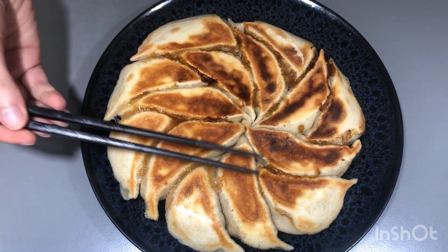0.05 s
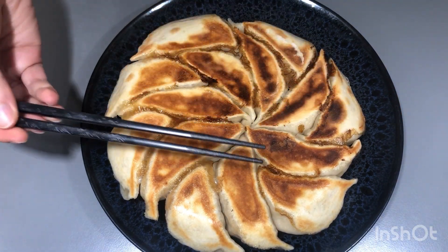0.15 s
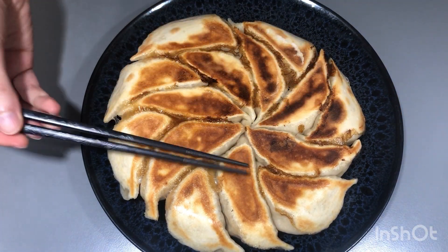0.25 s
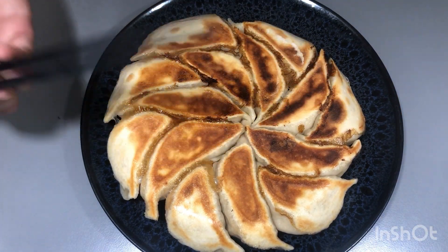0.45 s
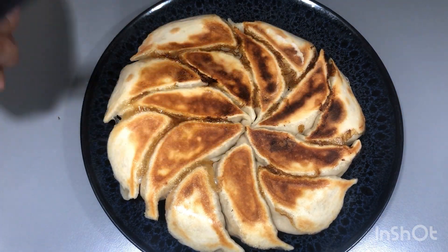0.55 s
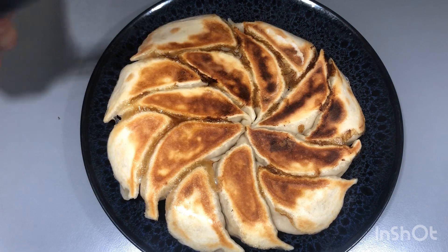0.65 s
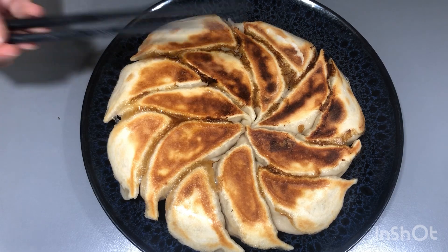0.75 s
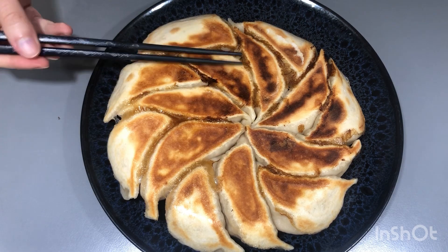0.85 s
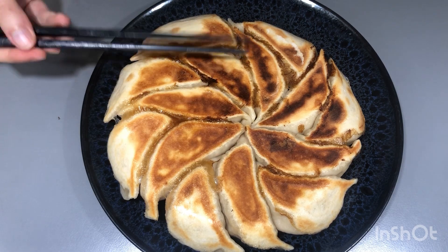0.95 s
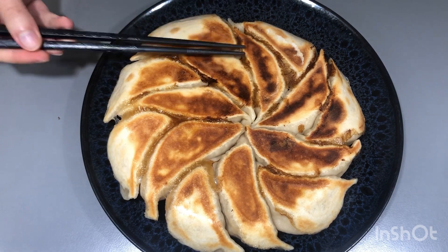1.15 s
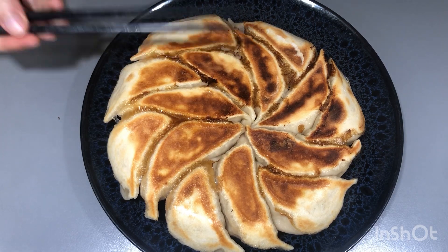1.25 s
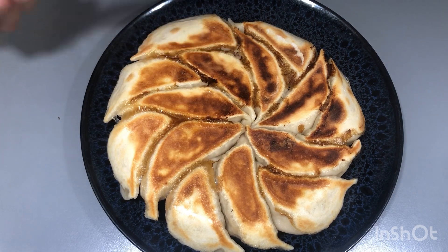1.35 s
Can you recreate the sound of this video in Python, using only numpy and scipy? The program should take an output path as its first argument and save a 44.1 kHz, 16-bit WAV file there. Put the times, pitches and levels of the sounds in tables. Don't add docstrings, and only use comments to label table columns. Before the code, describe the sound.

Chopsticks tapped tips-down on a hard table, three sharp knocks with light clicks between, quiet room

```python
import sys
import numpy as np
from scipy import signal
from scipy.fft import rfft, irfft, next_fast_len
from scipy.io import wavfile
from scipy.ndimage import map_coordinates

SR = 44100
rng = np.random.default_rng(int(sys.argv[2]) if len(sys.argv) > 2 else 0)


def bounce(signal):
    frames = np.transpose(np.atleast_2d(signal))
    limited = np.clip(frames, -1, 1)
    pcm = np.round(limited * 32767).astype(np.int16)
    wavfile.write(sys.argv[1], SR, pcm)


def ratio(d):
    e = np.asarray(d, float) / 20
    return 10 ** e


N = 61739
LEAD_IN = 4096

# frequency in Hz, level in dB per Hz.
FLOOR = [(30, -23.5), (55, -1), (90, 1), (161, -8), (273, -6.5), (470, -16.5), (2000, -29), (13000, -34.5),
         (15500, -26.5)]
FLOOR_DB, HUM_SWING_DB = -64, 1.2

# frequency in Hz, time to fall 60 dB in seconds.
ROOM_DECAY = [(100, 0.9), (600, 0.25), (2000, 0.23), (6000, 0.21), (15000, 0.17)]
KNOCK_ROOM_DB, CRACK_ROOM_DB, CLICK_ROOM_DB, ROOM_DELAY_S = -11, -7, -7, 0.002
EARLY_DB, EARLY_T60 = 3.5, 0.033

# start in seconds, level in dB, loss above the middle in dB per octave,
# loss below it in dB per octave, lift of even over odd high modes in dB.
CLICKS = [
    (0.2963, -40, -4, -0.8, 4.5),
    (0.3755, -40, -5, -3.3, -1.5),
    (0.856, -48.5, -1, 1, -0.5),
    (0.9665, -44, 3.5, -2, -0.5),
    (1.1933, -47, 3, -1.5, 1),
    (1.2539, -49, 16, 1, 1.5),
    (0.1931, -80.5, -11, -15.3, 0.5),
]
BAR_HZ = [1670, 2510, 3090, 3770, 5165, 6685, 8340, 10270, 12280, 14450]
# level in dB, time to fall 60 dB in seconds.
BAR_RING = [(-16.5, 0.017), (-14, .08), (-16, 0.051), (-11.5, 0.097), (-7.5, 0.079), (-0.5, 0.067),
            (-1.5, 0.04), (-4.5, 0.065), (-7, 0.032), (-5, 0.017)]
BAR_RISE_S = 0.0006
TWIN_PITCH, TWIN_DB = 0.98, -12.5
TICK_DB, TICK_T60 = 8.5, 0.032

# start in seconds, knock level in dB, crack level in dB,
# table thud level in dB. The same columns hold for every tap and for the rebound.
JUST_PASSED_TAP = [
    (-.02, -16, -9, -40.5),
]
FIRST_TAP = [
    (.2184, -20.5, -12.5, -44.5),
    (.2207, -32, -9, -48.5),
    (.2214, -29.5, -13, -46),
    (.2226, -30.5, -17.5, -61),
    (.2278, -50.5, -38, -48.5),
]
SECOND_TAP = [
    (.8316, -25.5, -16, -42),
    (.8341, -37, -25, -69),
    (.8385, -41, -39, -65.5),
]
REBOUND = [
    (.8546, -45.5, -38, -71),
    (.8600, -47.5, -43, -63),
    (.8650, -50, -41, -47.5),
    (.8667, -62, -50, -51),
    (.8720, -58, -56, -61),
]
THIRD_TAP = [
    (1.1138, -24, -18.5, -42.5),
    (1.1193, -31, -17, -47.5),
    (1.1264, -33, -45, -51.5),
]

# frequency in Hz, level in dB, time to fall 60 dB in seconds.
JUST_PASSED_BODY = [(296, -16, .05), (640, -10.5, .03), (1250, -9, 0.031), (2210, -10.5, 0.029),
                    (3350, -22.5, 0.023), (6000, -13.5, 0.025)]
FIRST_BODY = [(472, -10.5, 0.032), (754, -7, 0.022), (1008, -11.5, 0.023), (1276, -7, 0.05),
              (1965, -6, 0.033), (2194, -4, 0.047), (3207, -3.5, 0.035), (4410, -2, 0.013),
              (4370, -6, 0.018), (5750, -5, .016), (6570, -5, 0.025), (8870, -11.5, 0.01),
              (11580, -2.5, 0.01), (14870, -4.5, .02)]
SECOND_BODY = [(435, -10.5, 0.049), (642, -5, 0.091), (1250, 5, 0.015), (1318, -17, 0.049),
               (2160, -8.5, 0.028), (3200, -35, 0.016), (8640, -15, 0.048), (10450, -14, 0.045),
               (12420, -12.5, 0.091), (13700, -11, .03), (14600, -15, 0.026)]
REBOUND_BODY = [(670, 2, 0.026), (1110, 3.5, 0.026), (1630, -9.5, 0.084), (1930, 7, 0.013),
                (2190, 1.5, 0.023), (3120, -1, .02)]
THIRD_BODY = [(455, -14, 0.11), (706, -5, 0.03), (1140, -15, 0.019), (1225, 4.5, 0.017), (1370, -5.5, .03),
              (2043, -9, 0.029), (2560, -33, 0.033), (3100, -14, 0.019), (4430, -40, .015),
              (7140, -17, 0.033), (14680, -18, .02)]
KNOCK_RISE_S, KNOCK_LOW_HZ = 0.00065, 324

# frequency in Hz, level in dB per Hz.
FIRST_CRACK = [(600, -10.5), (1500, -5), (4000, -2), (8000, -3.5), (12000, -4), (16000, -2.5)]
SECOND_CRACK = [(300, -7), (1500, -15.5), (4000, -3), (7000, -12.5), (11000, 1.5), (16000, 4)]
REBOUND_CRACK = [(300, -21), (2000, 8.5), (5000, 3.5), (7000, -24), (16000, -32)]
THIRD_CRACK = [(300, -3.5), (1500, 2), (4000, 3), (8000, -4.5), (10500, -10.5), (14500, -7.5), (16000, 4)]
CRACK_T60 = 0.0051
SPIKE_DB = 4.5

# frequency in Hz, level in dB, time to fall 60 dB in seconds.
TABLE_SHAKE = [(75.7, -6.5, 0.53), (94, -12.5, 0.076), (137.2, 2, .16), (159, 5.5, 0.074),
               (230.1, -3.5, 0.072), (266.5, 2, 0.099), (489, -7.5, .15), (558, -9.5, .2)]
THUD_RISE_CYCLES = 0.96

ROUGH, ROUGH_FULL_HZ, ROUGH_PER_S = 0.45, 4000, 350
NOTCH_HZ, NOTCH_WIDE_HZ = 3695, 483

# frequency in Hz, level in dB.
PHONE_TOP = [(15750, 0), (16000, -24), (17050, -34), (17200, -80)]
LIFT_HZ, LIFT_WIDE_HZ, LIFT_GAIN = 3100, 50, 0.25
LOW_CUT_HZ = 40


def along(points, hz):
    f, v = np.transpose(points)
    return np.interp(np.log(hz + 1), np.log(f + 1), v)


def filtered(x, response):
    m = 2 * next_fast_len(x.shape[-1] // 2 + 4096)
    spectrum = rfft(x, m) * response(np.fft.rfftfreq(m, 1 / SR))
    return irfft(spectrum, m)[..., :x.shape[-1]]


def causal(points):
    def response(hz):
        c = irfft(np.log(ratio(along(points, hz))))
        c[1:len(c) // 2] *= 2
        c[len(c) // 2 + 1:] = 0
        return np.exp(rfft(c))
    return response


def low_cut(x, hz):
    return signal.sosfilt(signal.butter(4, hz, "high", fs=SR, output="sos"), x)


def add(track, s, sound):
    part = track[LEAD_IN + round(s * SR):][:len(sound)]
    part += sound[:len(part)]


def ring(modes, rise, t):
    hz, db, t60 = np.transpose(modes)[:, :, None]
    knots = rng.standard_normal((2, len(hz), int(t[-1] * ROUGH_PER_S) + 3))
    wander = np.apply_along_axis(lambda k: np.interp(t * ROUGH_PER_S, np.arange(len(k)), k), 2, knots)
    u, v = ROUGH * np.minimum(hz / ROUGH_FULL_HZ, 1) * wander
    wave = (1 + u) * np.sin(2 * np.pi * hz * t) + v * np.cos(2 * np.pi * hz * t)
    swell = 1 - np.exp(-t / rise)
    return (ratio(db - 60 * t / t60) * wave * swell).sum(0)


def floor():
    noise = filtered(rng.standard_normal(N), lambda hz: ratio(along(FLOOR, hz)) * (hz > 20))
    rumble = filtered(noise, lambda hz: 1 / (1 + (hz / 400) ** 2))
    swing = map_coordinates(rng.standard_normal(40), [np.arange(N) * 12 / SR])
    swelling = rumble * (ratio(HUM_SWING_DB * swing) - 1)
    return ratio(FLOOR_DB) * (noise + swelling) / noise.std()


def room(x):
    hz, t, z = signal.stft(rng.standard_normal(SR // 2), SR, nperseg=256)
    fade = ratio(-60 * t / along(ROOM_DECAY, hz)[:, None])
    tail = signal.istft(z * fade, SR, nperseg=256)[1]
    tail = tail * (1 + ratio(EARLY_DB - 60 * np.arange(len(tail)) / SR / EARLY_T60))
    delayed = np.pad(x, (round(ROOM_DELAY_S * SR), 0))
    return signal.fftconvolve(delayed, tail / np.linalg.norm(tail))[:len(x)]


def clicks():
    out = np.zeros(N + LEAD_IN)
    t = np.arange(SR // 4) / SR
    hz = np.array(BAR_HZ)
    level, t60 = np.transpose(BAR_RING)
    octave = np.log2(hz / hz[5])
    even_odd = (-1) ** np.arange(len(hz)) * (octave >= 0)
    for s, db, high_db, low_db, even_db in CLICKS:
        slope = level - np.where(octave > 0, high_db, -low_db) * octave
        colour = slope + even_db * even_odd
        touch = filtered(rng.standard_normal(len(t)), causal(np.c_[[600, *hz], [-45, *slope]]))
        tick = ratio(TICK_DB - 60 * t / TICK_T60) * touch
        stick = ring(np.c_[hz, colour, t60], BAR_RISE_S, t)
        twin = ring(np.c_[hz * TWIN_PITCH, colour + TWIN_DB, t60], BAR_RISE_S, t)
        click = np.zeros_like(out)
        add(click, s, ratio(db) * (stick + twin + tick))
        out += click + ratio(CLICK_ROOM_DB) * room(click)
    return out


def table_thud(t):
    hz, level, t60 = np.transpose(TABLE_SHAKE)[:, :, None]
    swell = 1 - np.exp(-(t * hz / THUD_RISE_CYCLES) ** 2)
    return (ratio(level - 60 * t / t60) * np.sin(2 * np.pi * hz * t) * swell).sum(0)


def tip_crack(t):
    crackle = rng.standard_normal(len(t) - 2)
    return ratio(-60 * t / CRACK_T60) * np.r_[-ratio(SPIKE_DB), ratio(SPIKE_DB) / 2, crackle]


def direct_dip(hz):
    width = 1j * hz * NOTCH_WIDE_HZ
    return 1 - width / (NOTCH_HZ ** 2 - hz ** 2 + width)


def tap(contacts, body, crack_colour):
    knock, crack, thud = np.zeros((3, N + LEAD_IN))
    t = np.arange(SR // 3) / SR
    shake = table_thud(t)
    for s, knock_db, crack_db, thud_db in contacts:
        add(knock, s, ratio(knock_db) * ring(body, KNOCK_RISE_S, t[:SR // 8]))
        add(crack, s, ratio(crack_db) * tip_crack(t))
        add(thud, s, ratio(thud_db) * shake)
    knock = low_cut(knock, KNOCK_LOW_HZ)
    crack = low_cut(filtered(crack, causal(crack_colour)), KNOCK_LOW_HZ)
    direct = filtered(knock + crack, direct_dip)
    return direct + thud + room(ratio(KNOCK_ROOM_DB) * knock + ratio(CRACK_ROOM_DB) * crack)


def scene():
    taps = tap(JUST_PASSED_TAP, JUST_PASSED_BODY, FIRST_CRACK)
    taps += tap(FIRST_TAP, FIRST_BODY, FIRST_CRACK)
    taps += tap(SECOND_TAP, SECOND_BODY, SECOND_CRACK)
    taps += tap(REBOUND, REBOUND_BODY, REBOUND_CRACK)
    taps += tap(THIRD_TAP, THIRD_BODY, THIRD_CRACK)
    return (taps + clicks())[None, LEAD_IN:] + floor()


def roll_off(x):
    return signal.sosfilt(signal.butter(12, 17140, fs=SR, output="sos"), x)


def record(dry):
    def phone(hz):
        lift = 1 + LIFT_GAIN / (1 + ((hz - LIFT_HZ) / LIFT_WIDE_HZ) ** 2)
        return lift * causal(PHONE_TOP)(hz)
    mix = filtered(low_cut(dry, LOW_CUT_HZ), phone)
    return roll_off(mix)


dry = scene()
out = record(dry)
bounce(out)
```